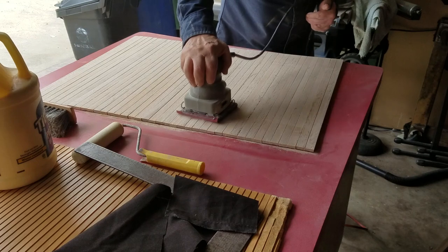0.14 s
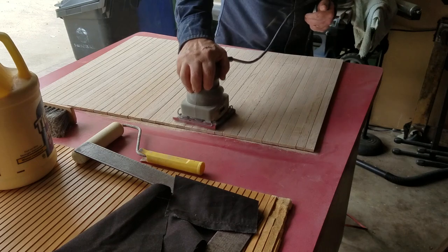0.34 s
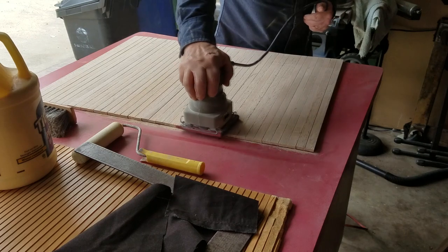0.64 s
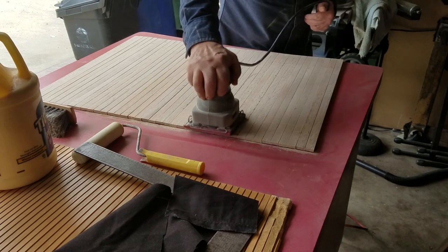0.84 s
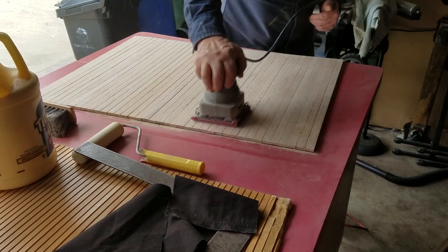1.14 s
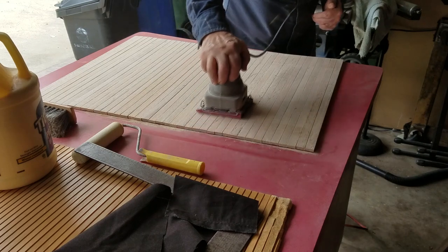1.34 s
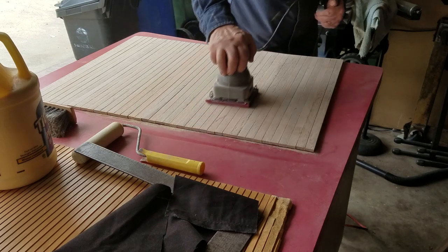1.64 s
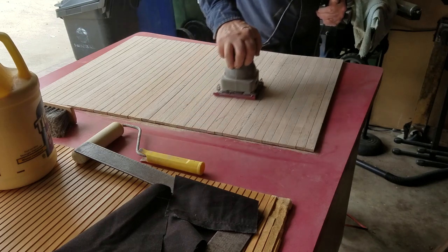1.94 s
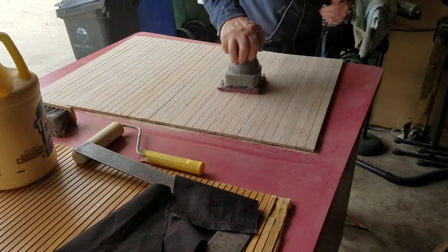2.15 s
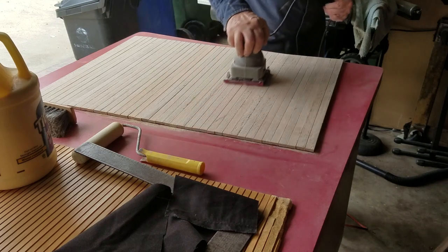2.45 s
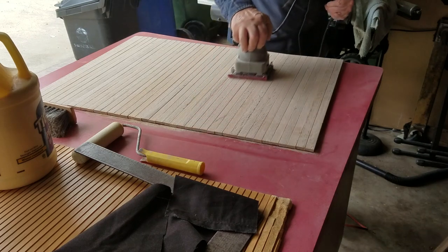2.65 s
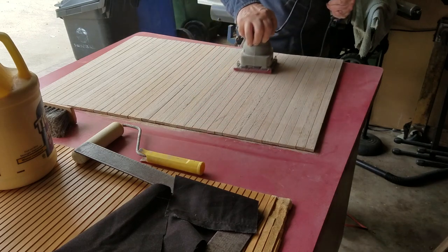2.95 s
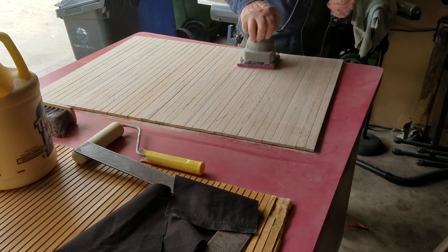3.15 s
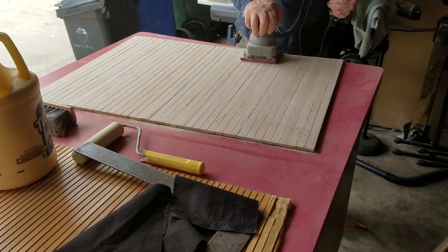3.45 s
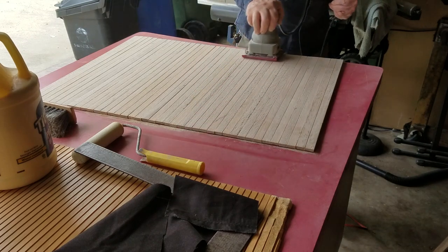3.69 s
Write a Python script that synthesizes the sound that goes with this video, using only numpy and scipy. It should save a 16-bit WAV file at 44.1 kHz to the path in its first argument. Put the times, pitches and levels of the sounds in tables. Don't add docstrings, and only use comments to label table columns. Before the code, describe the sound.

An electric palm sander buzzes steadily over a slatted wooden panel, rising slightly near the end.

```python
import sys
import numpy as np
from scipy import signal
from scipy.fft import rfft, irfft, next_fast_len
from scipy.io import wavfile
from scipy.ndimage import uniform_filter1d, map_coordinates

SR = 44100
rng = np.random.default_rng(int(sys.argv[2]) if len(sys.argv) > 2 else 0)


def voltage_ratio(decibels):
    exponent = np.asarray(decibels, float) / 20
    return 10 ** exponent


def file_out(sig):
    cols = np.atleast_2d(sig).T
    lim = np.clip(cols, -1, 1)
    pcm = np.round(lim * 32767).astype(np.int16)
    wavfile.write(sys.argv[1], SR, pcm)


N = 168462

# (time [s], orbit rate [Hz])
ORBIT_HZ = [
    (0, 224.4),
    (.42, 224.5),
    (.68, 222.9),
    (1.05, 222.2),
    (1.3, 221.6),
    (1.9, 222.4),
    (2.36, 223.1),
    (2.95, 225.3),
    (3.5, 227.7),
    (3.82, 230.5),
]


def unit(x):
    return x / np.sqrt(np.mean(x ** 2) + 1e-20)


def along(points, hz):
    point_hz, value = np.transpose(points)
    return np.interp(np.log(hz + 1), np.log(point_hz + 1), value)


def wobble(rate_hz, count=1, step=1):
    at = np.arange(0, N + step, step)[:N] * rate_hz / SR
    knots = rng.standard_normal((count, 600))
    return np.array([map_coordinates(row[:int(at[-1]) + 4], [at]) for row in knots])


def filtered(x, response):
    m = next_fast_len(N + 8192)
    return irfft(rfft(x, m) * response(np.fft.rfftfreq(m, 1 / SR)), m)[..., :N]


def rush(spectrum, alike, patchy_db):
    z = signal.stft(rng.standard_normal((2, N)), nperseg=512)[2]
    field = uniform_filter1d(rng.standard_normal(z.shape[1:]), 6, 0)
    field = uniform_filter1d(field, 24, 1)
    pair = signal.istft(z * voltage_ratio(patchy_db * unit(field)), nperseg=512)[1][:, :N]
    bounded = [(0.92, -120)] + spectrum + [(22050, -120)]

    def mid_side_gain(hz):
        turn = np.arccos(np.clip(along(alike, hz), -1, 1)) / 2
        return voltage_ratio(along(bounded, hz)) * [np.cos(turn), np.sin(turn)]

    mid, side = filtered(pair, mid_side_gain)
    return unit(np.array([mid + side, mid - side]))


def swell(k, t, table):
    return sum(up_db * np.exp(-((t - at) / half) ** 2) for at, half, n, up_db in table if round(n) == k)


def workshop():
    # (frequency [Hz], density [dB per Hz])
    murmur = [(20, -40), (45, -11), (85, 4), (160, -2), (260, 6.5), (330, -11), (400, -61)]
    return voltage_ratio(-69.5) * rush(murmur, [(100, 0.99)], patchy_db=-1.0)


def camera():
    # (frequency [Hz], density [dB per Hz])
    handling = [(8, 0), (25, -3), (42, -20), (90, -45)]
    # (frequency [Hz], level [dB], start phase [turns])
    body_modes = [
        (134.4, -26, 0.38),
        (265.4, -38.5, 0.26),
    ]
    handling_end_s, bump_s = 0.75, 0.719
    length_s, rise_s, fall_s = 0.0268, 0.011, 0.0035
    t = np.arange(N) / SR
    held = np.clip((handling_end_s - t) / 0.02, 0, 1)
    rumble = voltage_ratio(-70.5 + 3.3 * wobble(9.2)) * rush(handling, [(30, 0.71)], patchy_db=0.0) * held
    since_s = t - bump_s
    ramp = np.clip(np.minimum(since_s / rise_s, (length_s - since_s) / fall_s), 0, 1)
    shape = np.sin(np.pi / 2 * ramp) ** 2
    ring = sum(voltage_ratio(db) * np.sin(2 * np.pi * (hz * since_s + turns)) for hz, db, turns in body_modes)
    return rumble + shape * ring


def order(k, level, orbit_rad, wander_db):
    # (frequency [Hz], side share of an order [ratio])
    spread = [(220, .085), (700, .27), (1500, .46), (4000, .48), (10000, .65)]
    # (time [s], half width [s], order [-], level [dB])
    slats = [(0.59, 0.14, 7, 9), (0.56, 0.15, 5, 5.5), (0.14, 0.43, 7, 3.5), (3.74, 0.12, 6, 4.5),
             (3.64, 0.14, 16, 8), (3.17, 0.14, 18, 8), (3.63, 0.25, 24, 17), (3.8, .15, 36, 7),
             (2.9, .15, 34, -3), (3.77, 0.15, 35, 5), (3.68, 0.19, 9, 2.5), (0.78, 0.06, 17, 9),
             (3.55, 0.31, 5, 4.5), (3.7, 0.28, 8, 6.5), (0.96, .1, 12, -5), (3.4, 0.22, 13, 5.5),
             (0.31, 0.54, 14, 7.5), (2.55, .33, 14, -17), (3.53, .12, 17, -20), (.14, 0.23, 17, -3),
             (1.5, 0.15, 18, 5), (3, .1, 18, -11), (.98, .1, 18, -12), (0.34, .35, 19, -5),
             (2.53, .2, 19, 5), (2.6, 0.32, 20, 2.5), (.65, .2, 20, -5), (1.3, .17, 21, 0),
             (1.13, 0.19, 21, -7), (0.62, 0.097, 21, 10), (3, 0.11, 21, 8), (0.21, .25, 22, 3),
             (0.99, .17, 22, -11), (1.44, 0.17, 22, 3), (1.81, .1, 22, -1), (2.6, 0.18, 22, -4),
             (3.65, .25, 23, 12), (1.5, 0.23, 23, -17), (2.83, 0.14, 23, -9), (2.9, .2, 24, 10),
             (1.85, .13, 25, 7), (3.15, .2, 25, 7.5), (1.1, 0.33, 25, -7), (2.75, .3, 26, -5),
             (1.7, .6, 41, 17), (2.97, .2, 29, 14), (3.95, .25, 34, 9), (3.57, 0.15, 44, 5),
             (3.05, .2, 38, 8), (4, .2, 31, -8)]
    # (time [s], half width [s], order [-], level
    # [dB])
    more_slats = [
        (0.63, 0.14, 2, -5),
        (3.2, .33, 8, 7),
        (0.72, .15, 4, -5),
        (1.62, .17, 7, 5),
        (2.7, 0.14, 11, 3),
    ]
    # (time [s], half width [s], order [-], left over right [dB])
    swings = [(1.93, 0.67, 1, -2.5), (0.32, .6, 2, 2), (1.74, 0.37, 2, -6), (0.6, 0.66, 3, 5.5),
              (3.2, 0.66, 3, -4), (3.5, 0.36, 4, -4.5), (1, .2, 4, 8), (.2, 0.41, 5, -9), (1.6, 0.2, 5, 4),
              (0.67, 0.48, 6, -14), (2.1, 0.45, 6, 9.5), (2.5, 0.49, 7, 17), (3.5, .3, 7, -12),
              (0.74, 0.65, 8, 26), (2.6, 0.23, 10, 10), (0.51, 0.33, 10, -25), (2, .2, 11, 9),
              (1.7, .4, 12, -3), (2.85, .2, 12, 16), (3.07, .2, 13, -13)]
    slow_rate_hz, flutter_rate_hz, flutter_db = 2.944, 60, 0.2146
    centred_order, centred_share = 9, 0.45

    slow = wobble(slow_rate_hz, count=3, step=256)
    t, knots = np.arange(N), np.arange(0, N + 256, 256)
    flutter = flutter_db * wobble(flutter_rate_hz, step=256)[0] * np.sqrt(k)
    gain = voltage_ratio(swell(k, knots / SR, slats + more_slats) + wander_db * slow[0] + flutter)

    drift = 0.35 * slow[1] + 1j * (0.8 * rng.choice([-1, 1]) + 0.55 * slow[2])
    side = along(spread, k * ORBIT_HZ[0][1]) * drift
    if k == centred_order:
        side = side * centred_share
    side = side + np.tanh(swell(k, knots / SR, swings) * np.log(10) / 20 / 2)

    tone = np.sqrt(2) * level * np.exp(1j * k * orbit_rad)
    return np.array([(np.interp(t, knots, gain * (1 + way * side)) * tone).real for way in (1, -1)])


def sander():
    # (time [s], table shake [dB], panel ring [dB], pad chatter [dB], grit [dB], rasp [dB])
    strokes = [(0, -43, -46, -8, -2.5, 4), (.45, -42, -47, -8, 0, 3.5), (.58, -42, -53, -4, 0.5, 4),
               (.72, -41.5, -50, -6, 1, 5), (.99, -43, -44.5, -4, 0, 2), (1.31, -45, -44, -11, 1, -2),
               (1.8, -45, -45, 2, 2, -0.5), (2.3, -45.5, -45, 9.5, 1, 0),
               (2.5, -44.5, -44.5, 6.5, 1.5, -3.5), (2.97, -44, -46, 2.5, 1, -3),
               (3.49, -47, -45, 9.5, -0.5, -1), (3.72, -48, -48.5, 11, -0.5, 1),
               (3.82, -49, -63, 13.5, -6, 3)]
    # (order [-], level [dB], second path share [ratio], beats [Hz], start [turns])
    pad_orders = [(2, -58.5, 0.41, 0.566, 0.67), (4, -58, 0.54, 0.24, 0.3), (5, -58.5, 0.88, 0.14, 0.23),
                  (6, -51, 0.3, 0.49, 0.36), (7, -53, 0.55, 0.091, 0.33), (8, -65.5, 0.42, 0.41, 0.33),
                  (9, -54, 0.27, 0.17, 1), (10, -60.5, 0.62, 0.638, 0.1), (11, -64, 0.69, 0.18, 0.19),
                  (12, -64, 0.52, 0.55, 0.021), (13, -67.5, 0.78, 0.24, 0.85), (14, -65, 0.083, 0.72, 0.94),
                  (15, -72.5, 0.36, 0.52, 0.14), (16, -61.5, 0.23, 0.19, 0.64),
                  (17, -65.5, 0.92, 0.46, 0.18), (18, -64, 0.56, 0.1, 0.37), (19, -62.5, 0.12, 0.54, 0.86),
                  (20, -69.5, 0.34, 0.815, 0.58), (21, -69.5, 0.22, 0.45, 0.4), (22, -72, 0.39, 0.41, 0.21),
                  (23, -72, 0.42, 0.46, 0.15), (24, -67.5, 0.7, 0.394, 0.28), (25, -71.5, 0.35, 0.78, 0.16),
                  (26, -74.5, 0.35, 0.36, 0.46)]
    # (order [-], share [ratio], beats [Hz], start [turns])
    wall_path = [(2, 0.31, -0.27, 0.072), (4, 0.21, 1.555, 0.57), (5, 0.23, -0.51, 0.63),
                 (6, 0.21, -0.804, 0.033), (7, 0.32, -0.966, 0.97), (8, 0.52, -0.925, 0.49),
                 (9, 0.47, 0.504, 0.23), (10, 0.32, -0.695, 0.69), (11, 0.68, -0.6, 1),
                 (12, 0.79, -0.687, 0.83), (13, 0.58, -0.65, 0.83), (14, 0.73, -0.029, 0.54),
                 (15, 0.1, -1.3, 0.43), (16, 0.66, 0.091, 0.34), (17, 0.42, 0.75, 0.3),
                 (18, 0.25, 0.71, 0.4), (19, 1, -0.11, 0.68), (20, 0.5, 0.52, 0.18),
                 (21, 0.48, 1.125, 0.87), (22, 1, -1.17, 0.66), (23, 0.84, -0.78, 0.34),
                 (24, 0.78, -0.32, 0.594), (25, 0.32, 1.26, 0.94), (26, 0.22, 1.25, 1)]
    # (frequency [Hz], level of each [dB])
    high_orders = [(6000, -81.5), (6800, -88.5), (8100, -80), (9000, -86.5), (10500, -86)]
    # (frequency [Hz], density [dB per Hz])
    grit_spectrum = [(420, -16.5), (750, -4), (3000, -9.5), (6900, -15.5), (8400, -14.5), (9900, -16),
                     (12500, -12.5), (16000, -17)]
    # (frequency [Hz], density [dB per Hz])
    rasp_spectrum = [(400, -15), (540, -9.5), (800, -4), (1050, -10), (2400, -13.5)]
    # (frequency [Hz], left-right likeness [ratio])
    likeness = [(300, .97), (700, .85), (1700, .55), (3000, .6), (4000, .45), (8000, .3), (15000, .08)]
    # (frequency [Hz], left over right [dB])
    lean = [(200, -1.5), (380, 0), (700, -2), (1290, 1), (2380, 1), (4400, -0.5), (8120, 5.5), (15000, 6)]
    jitter_rad, snap_rad, snap_from_order = 0.0086, 0.85, 5

    t = np.arange(N) / SR
    time_s, *columns = np.transpose(strokes)
    shake_db, ring_db, chatter_db, grit_db, rasp_db = [np.interp(t, time_s, c) for c in columns]
    orbit_hz = np.interp(t, *np.transpose(ORBIT_HZ))
    jitter = jitter_rad * (wobble(40)[0] + 3 * wobble(5.7)[0])
    orbit_rad = 2 * np.pi * np.cumsum(orbit_hz) / SR + jitter

    tones = order(1, voltage_ratio(shake_db), orbit_rad, 0.23)
    tones += order(3, voltage_ratio(ring_db) * np.exp(-0.4j), orbit_rad, 0.24)

    def beat(share, beats_hz, turns):
        return share * np.exp(2j * np.pi * (beats_hz * t + turns))

    for (k, db, *panel), (_, *wall) in zip(pad_orders, wall_path):
        k = round(k)
        paths = np.abs(1 + beat(*panel) + beat(*wall))
        start_rad = rng.normal() * (snap_rad if k >= snap_from_order else np.pi)
        tones += order(k, voltage_ratio(db) * paths * np.exp(1j * start_rad), orbit_rad, 1.08)
    for k in range(27, 49):
        level = voltage_ratio(along(high_orders, k * orbit_hz[0]) + chatter_db)
        tones += order(k, level * np.exp(1j * snap_rad * rng.normal()), orbit_rad, 1)

    bite = 1 + 0.072 * np.cos(orbit_rad) + 0.1 * np.cos(2 * orbit_rad)
    grit_gain = voltage_ratio(-51.5 + grit_db + 0.22 * wobble(7.5)) * bite
    grit = grit_gain * rush(grit_spectrum, likeness, patchy_db=1.54)
    rasp = voltage_ratio(-57.5 + rasp_db) * bite ** 2 * rush(rasp_spectrum, likeness, patchy_db=2.1)
    return filtered(tones + grit + rasp, lambda hz: voltage_ratio(np.outer([0.5, -0.5], along(lean, hz))))


def scene():
    return workshop() + camera() + sander()


def top_cut(x):
    return signal.sosfilt(signal.butter(12, 16620, fs=SR, output="sos"), x)


def record(dry):
    top_hz = 15810
    mix = filtered(dry, lambda hz: hz < top_hz)
    return top_cut(mix)


dry = scene()
out = record(dry)
file_out(out)
```